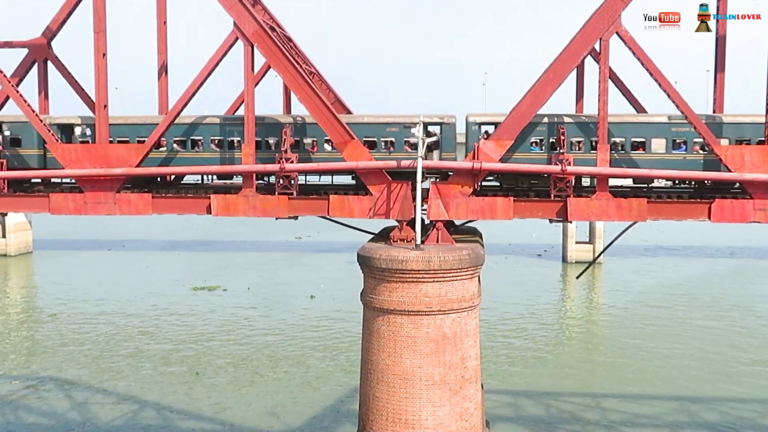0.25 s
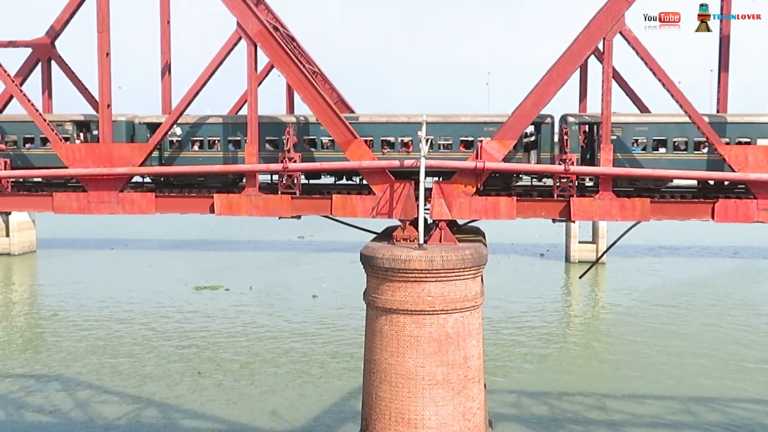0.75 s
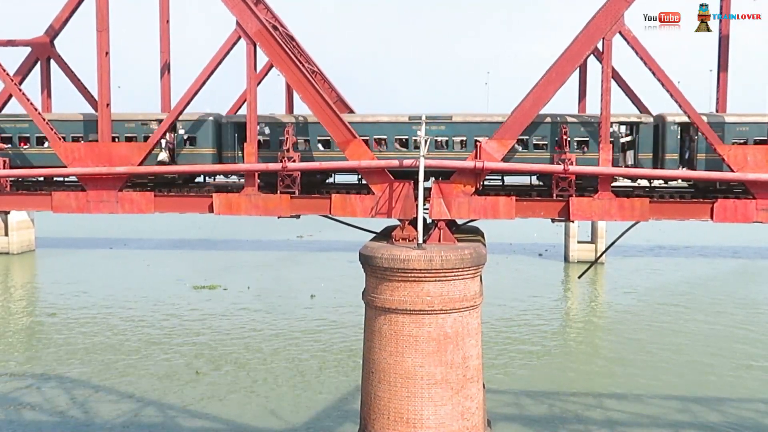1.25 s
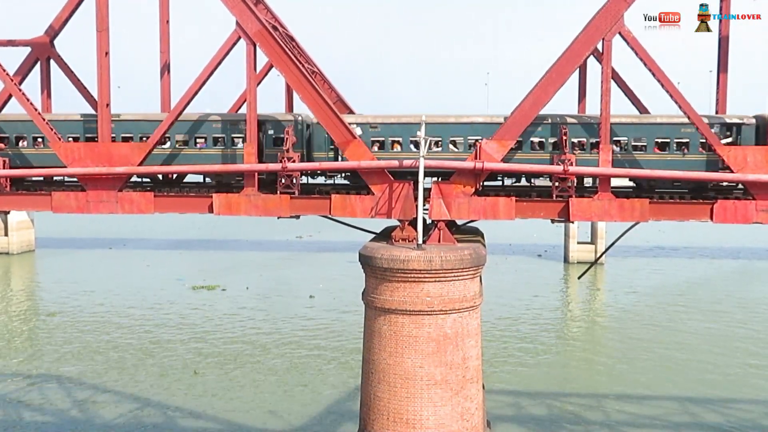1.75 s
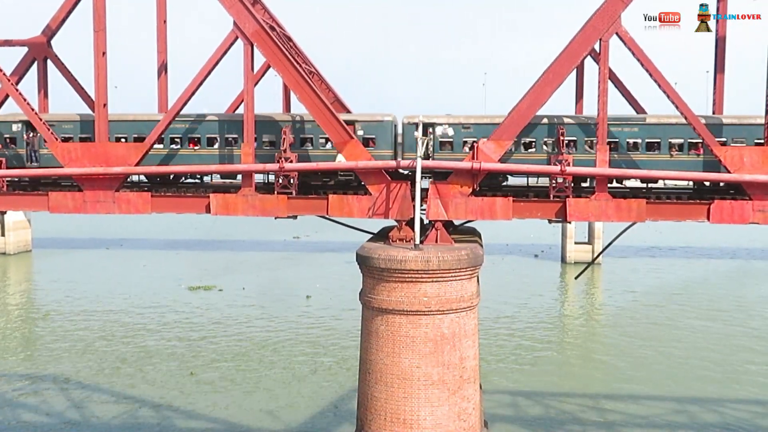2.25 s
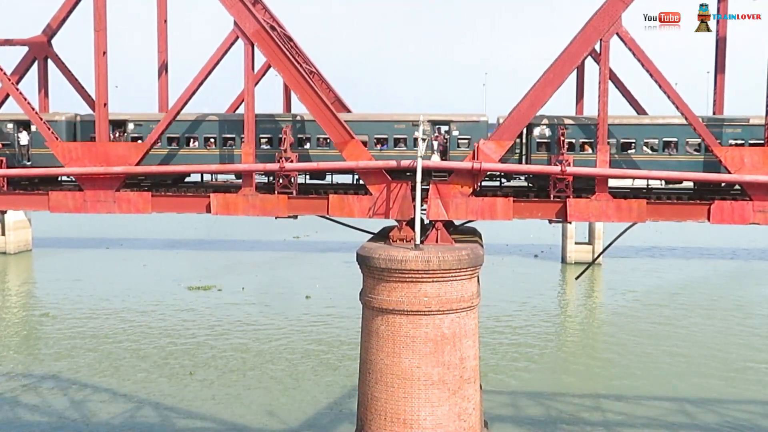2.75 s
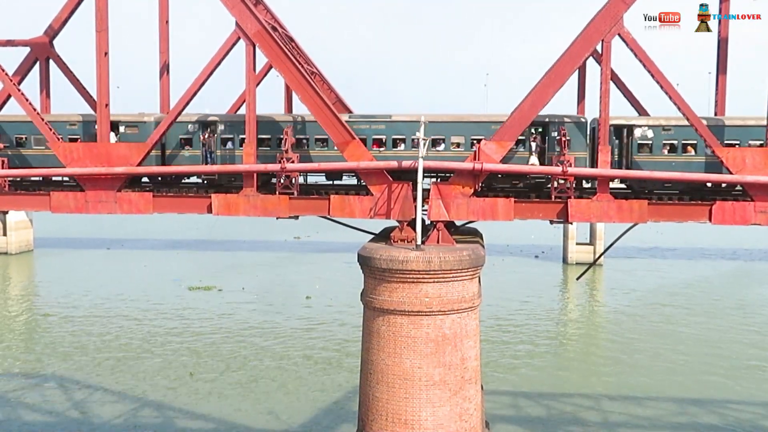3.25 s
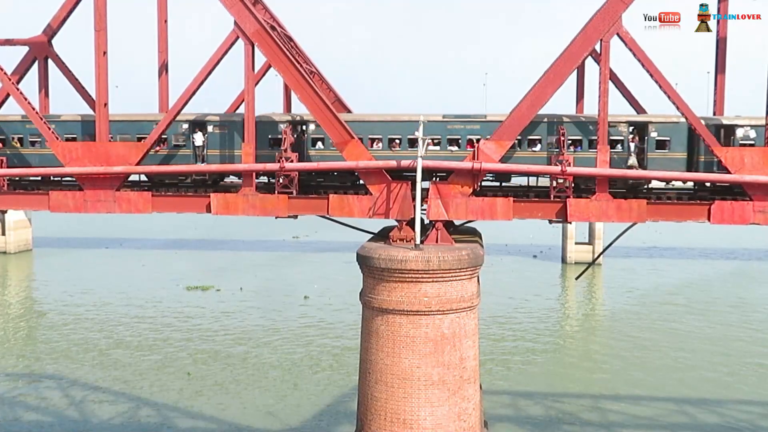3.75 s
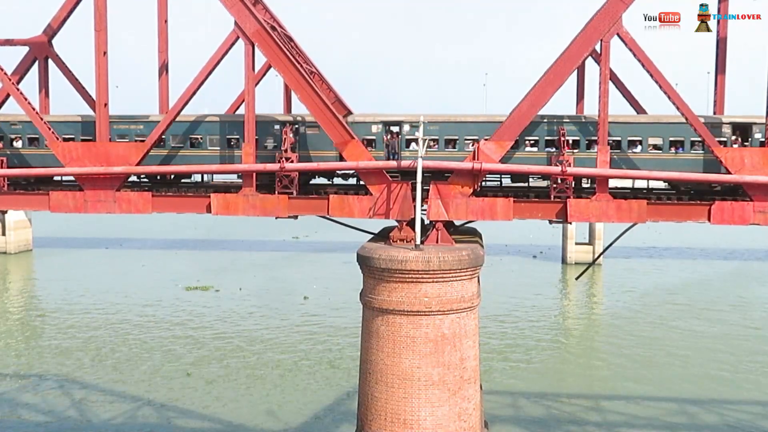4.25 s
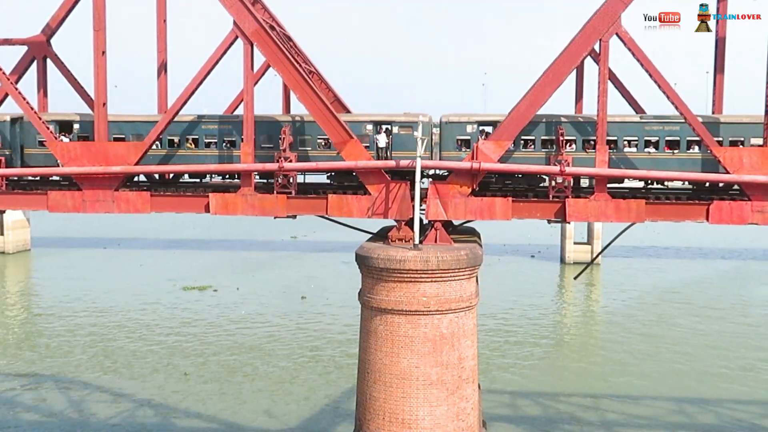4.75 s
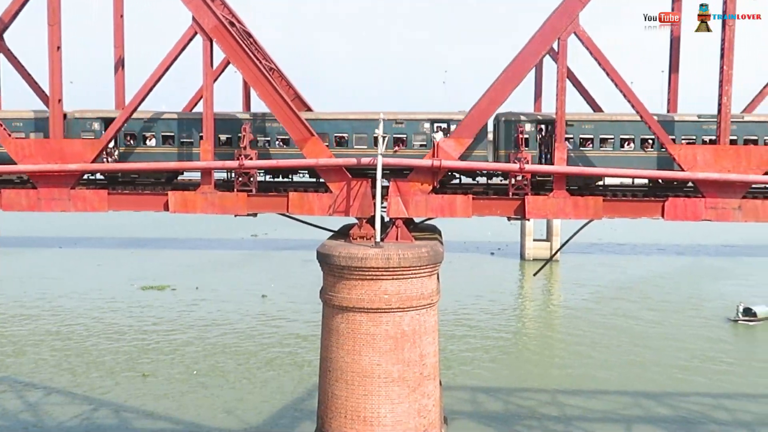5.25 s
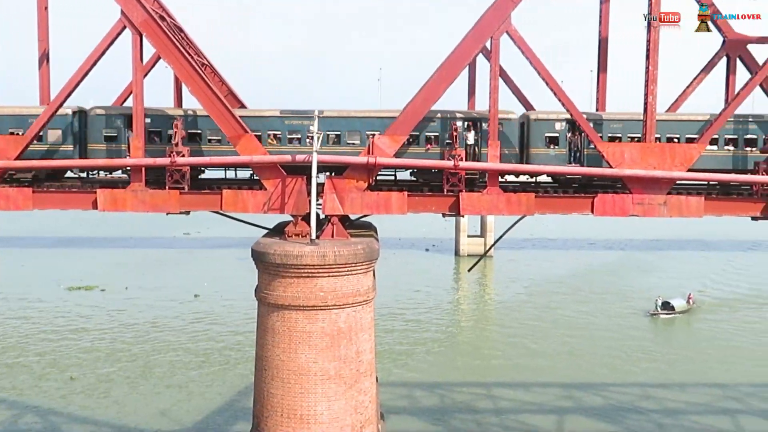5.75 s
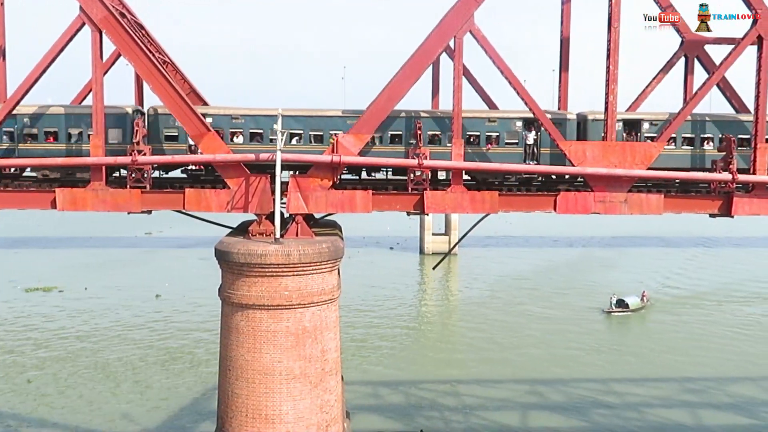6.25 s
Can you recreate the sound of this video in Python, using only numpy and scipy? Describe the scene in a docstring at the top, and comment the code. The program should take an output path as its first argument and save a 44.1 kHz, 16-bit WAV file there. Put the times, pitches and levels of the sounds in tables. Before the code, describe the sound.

Close beside a bridge pier, carriage after carriage rolls past with deep girder rumble, wheel roar, double clacks and rattling, pinging steel.

```python
"""Train on a steel truss bridge

A passenger train rolls over a steel truss bridge, heard from beside a pier. Noise shaped by plate
resonances makes the girders rumble; noise driven by rough treads makes the wheels roar and hiss.
Bogie after bogie strikes a rail joint: decaying noise bursts give a sharp crack, a rattling rebound and
a wash of ringing steel. Decaying or swelling tones make the pings, knocks, groans and flange squeals."""
import sys
import numpy as np
from scipy import signal
from scipy.fft import rfft, irfft
from scipy.io import wavfile
from scipy.ndimage import uniform_filter1d

SR = 44100
rng = np.random.default_rng(int(sys.argv[2]) if len(sys.argv) > 2 else 0)


def generate_wav(signal):
    """Clip the signal to [-1, 1] and save it as 16-bit WAV at the path in sys.argv[1]."""
    frames = np.transpose(np.atleast_2d(signal))
    scaled = np.clip(frames, -1, 1) * 32767
    pcm = np.round(scaled).astype(np.int16)
    wavfile.write(sys.argv[1], SR, pcm)


N = 286650
TIME = np.arange(N) / SR  # s
FREQ = np.maximum(np.arange(N // 2 + 1) * SR / N, 1)  # Hz, kept above zero for the logarithm


def undb(db):
    """Logarithmic level: decibels become an amplitude gain."""
    return 10 ** (np.asarray(db) / 20)


def curve(table, axis):
    """Linear interpolation: one column of a timed table at every sample."""
    rows = np.array(table)
    return np.interp(TIME, rows[:, 0], rows[:, axis])


def humps(table):
    """Gaussian modulation: level in dB from smooth rises and dips (time [s], half length [s], level [dB])."""
    return sum(db * np.exp(-((TIME - at) / length) ** 2) for at, length, db in table)


def shape(points):
    """Spectral envelope: gain at every frequency, interpolated in dB over log frequency."""
    hz, db = np.transpose(points)
    return undb(np.interp(np.log(FREQ), np.log(hz), db))


def walk(rate):
    """Random modulation: twice-smoothed steps, rate per second, with a standard deviation of 1."""
    step = max(int(SR / rate), 1)
    held = np.repeat(rng.standard_normal(N // step + 1), step)
    drift = uniform_filter1d(uniform_filter1d(held, step), step)[:N]
    return drift / np.std(drift)


# Wheels on the joint, two bogies at each coupling; levels are relative, the rebound's to its crack:
# (time [s], crack [dB], truss ring [dB], rebound [dB], rebound delay [s], chatter [dB], clunk [dB],
#  swell of the roar [dB])
JOINT = [(-0.054, -27, -28.5, 8, 0.031, -22, -39, 3.5), (0.2023, -28, -27.5, -20, 0.036, -28, -25.5, -1),
         (0.7724, -35.5, -29.5, 8.5, 0.032, -28, -36, 2.5), (1.0216, -31, -29.5, 0, 0.041, -31.5, -27, 3),
         (1.515, -30, -24, 6, 0.057, -32, -26, 4.5), (1.762, -24.5, -27, -2, 0.036, -31.5, -23, 2.5),
         (2.293, -25, -27, -13, 0.041, -29.5, -33, 2), (2.5378, -25, -27.5, -18, 0.033, -27, -42, 2),
         (3.111, -31, -26.5, 3, 0.022, -24.5, -20, -2), (3.346, -33, -27, 4, 0.043, -32.5, -24, 1.5),
         (3.835, -24.5, -23, 2, 0.042, -31, -26, 3.5), (4.076, -22, -26.5, -1, 0.034, -28, -22, 0),
         (4.601, -26.5, -26.5, -0.5, 0.019, -31, -23.5, 1), (4.8434, -24, -26.5, -11, 0.035, -35, -31, -1),
         (5.408, -35, -29.5, 7, 0.045, -27, -24, 2.5), (5.639, -30.5, -28, -2, 0.041, -30, -24, 0),
         (6.12, -22, -27.5, 1, 0.033, -36, -25, 2), (6.3586, -18.5, -27.5, -4.5, 0.037, -34, -24, 0)]


def swell(lag, half_length, share):
    """Moving load: level in dB that rises or dips as each bogie goes by."""
    return share * sum(lift_db * np.exp(-((TIME - at - lag) / half_length) ** 2) for at, *_, lift_db in JOINT)


def blows(times, levels_db, rise, t60):
    """Impulse response: summed power of vibrations that build up after each blow and decay exponentially."""
    power = np.zeros(N)
    for at, db in zip(times, levels_db):
        span = slice(*np.searchsorted(TIME, [at, at + t60]))
        age = TIME[span] - at
        envelope = (1 - np.exp(-age / rise)) * np.exp(-np.log(1000) * age / t60)
        power[span] += (undb(db) * envelope) ** 2
    return power


def chatter(times, levels_db):
    """Loose contact: power of a rail end that chatters more as the wheel nears and settles behind it."""
    build, fade = 0.035, 0.015  # time constants of power, s
    return sum(undb(db) ** 2 * np.exp(-np.maximum((at - TIME) / build, (TIME - at) / fade))
               for at, db in zip(times, levels_db))


# Stereo width against pitch: (frequency [Hz], side minus mid [dB])
WIDTH = [(30, -25.5), (70, -31), (128, -26), (170, -26.5), (370, -30.5), (440, -24), (510, -25),
         (690, -19.5), (830, -21), (950, -18), (1050, -19), (1470, -16), (2500, -10.5), (4270, -7.5),
         (7270, 0.5)]
# Stereo balance against pitch: (frequency [Hz], left minus right [dB])
LEAN = [(250, -0.3), (500, -0.9), (1000, -1.2), (3000, -0.3)]


def vibration(points, modes=(), grain_db=0, side_db=0):
    """Random excitation of resonances: stereo noise shaped by a spectrum and its modes, mid at unit level."""
    gain = shape(points)
    for hz, width, db in modes:
        gain = gain * undb(db / (1 + (2 * (FREQ - hz) / width) ** 2))
    # the strength of the tiny impacts scatters every 32 samples
    size = undb(grain_db * np.repeat(rng.standard_normal(N // 32 + 1), 32)[:N])
    mid, side = rfft(rng.standard_normal((2, N)) * size) * gain
    side = side * shape(WIDTH) * undb(side_db)
    lean = np.sqrt(shape(LEAN))
    return irfft([(mid + side) * lean, (mid - side) / lean], N) / np.std(irfft(mid, N))


def steady(sound, seconds):
    """Constant load: a vibration held even by dividing out its running RMS level."""
    return sound / np.sqrt(uniform_filter1d(sound[0] ** 2, int(seconds * SR) + 1) + 1e-9)


def rattle(shake, pitches, count, t60, spread_db):
    """Scattered resonators: shaken steel parts ping, each at its own pitch and place, scaled by the shaking."""
    out = np.zeros((2, N))
    age = TIME[:SR // 12]
    envelope = (1 - np.exp(-age / .0004)) * np.exp(-np.log(1000) * age / t60)
    colour, low, high = shape(pitches), pitches[0][0], pitches[-1][0]
    for when, pitch, force, place in rng.random((count, 4)):
        start = int(when * (N - len(age)))
        hz = low * (high / low) ** pitch
        scatter = undb(spread_db * min(-np.log(force), 2))
        size = shake[start] * colour[int(hz * N / SR)] * scatter
        angle = (place - .5) * np.pi * hz / 7000  # higher pings differ more between the ears
        phase = 2 * np.pi * hz * age + np.array([[angle], [-angle]])
        out[:, start:start + len(age)] += size * envelope * np.sin(phase)
    return out


# Single girders bent by the axle load:
# (time [s], standard deviation of the swell [s], pitch [Hz], relative level [dB])
GROANS = [(0.034, 0.083, 176.7, -12), (.19, 0.06, 280, -23), (.42, .04, 99.9, -21),
          (.43, .08, 341.8, -20.5), (.6, 0.064, 122, -24), (0.715, 0.072, 199.4, -17.5),
          (0.88, 0.044, 336.4, -18.5), (0.898, .05, 183, -20), (1.0, .03, 89.8, -23),
          (1.054, 0.081, 204.8, -20), (1.095, 0.043, 429.5, -25.5), (1.61, 0.053, 186.1, -18),
          (1.62, 0.048, 139.9, -19), (1.852, 0.05, 399.4, -23.5), (2.006, 0.047, 188.3, -16.5),
          (2.335, 0.057, 238, -19), (2.35, 0.063, 340, -23), (2.47, .05, 180.5, -19),
          (2.587, 0.092, 209.7, -17.5), (2.46, .05, 110.7, -21.5), (2.64, 0.049, 112.3, -18.5),
          (2.87, 0.039, 186, -17.5), (3.09, 0.05, 200.5, -18), (3.2, 0.047, 376, -20),
          (3.22, 0.048, 155, -14.5), (3.406, .05, 345, -18), (3.43, .045, 193, -16), (3.39, 0.064, 90, -21),
          (3.963, .07, 380.4, -22.5), (4.08, 0.074, 191, -17), (4.133, 0.044, 437, -22.5),
          (4.667, 0.062, 322.3, -18.5), (4.72, 0.091, 165.3, -20), (4.908, 0.064, 155, -17.5),
          (4.92, 0.044, 96, -15), (5.1, 0.075, 220, -28), (5.264, .06, 345, -25),
          (5.497, 0.083, 366.6, -20), (5.909, 0.032, 268.4, -22), (6.133, 0.062, 100.2, -20.5),
          (6.164, 0.045, 370, -19), (6.2, .06, 186.5, -16.5), (6.258, .035, 246.6, -18.5),
          (6.39, 0.049, 339, -21), (6.423, 0.043, 190, -15)]


def groans():
    """Modal cluster: a bent girder swells and fades in twelve close modes round its pitch."""
    bandwidth = .13  # share of the pitch, two standard deviations of the detuning
    out = np.zeros(N)
    for at, length, hz, db in GROANS:
        span = slice(*np.searchsorted(TIME, [at - 2.5 * length, at + 2.5 * length]))
        envelope = np.exp(-((TIME[span] - at) / length) ** 2 / 2)
        detune, phase = rng.standard_normal((2, 12, 1))
        mode_hz = hz * (1 + bandwidth * detune / 2)
        ring = envelope * np.sin(2 * np.pi * (mode_hz * TIME[span] + phase)).sum(axis=0)
        # equal energy however the modes beat
        out[span] += undb(db) * ring * np.linalg.norm(envelope) / np.linalg.norm(ring)
    return out


# Some carriages run rougher than others; relative levels as the middle of each passes:
# (time [s], deck boom [dB], plate rumble [dB], wheel roar [dB], tread hiss [dB], cross-beam drone [dB])
CARRIAGES = [(-0.3, -16.5, -22, -23.5, -43, -18), (0.5, -24.5, -17, -24, -38.5, -24),
             (1.28, -23.5, -21, -27, -42, -21), (2.05, -22, -20, -24, -40.5, -23.5),
             (2.8, -24, -18, -24, -38, -21), (3.62, -24, -19, -24.5, -41.5, -23),
             (4.35, -25, -21, -25, -40.5, -21), (5.12, -22.5, -18, -23, -39.5, -20.5),
             (5.88, -24.5, -20.5, -25, -40, -22), (6.65, -22, -21, -22.5, -32.5, -23.5)]
# Swell of deck and plates with each bogie:
# (lag after the joint [s], half length [s], multiple of the roar's swell [1])
DECK_SWELL = (0.1, 0.077, 0.74)
PLATE_SWELL = (0.09, 0.13, 0.62)
# Heavier booms of the deck: (time [s], relative level [dB])
BOOMS = [(1.09, -14), (1.81, -6.5), (2.25, -9), (2.94, -10.5), (3.08, -10), (3.26, -10), (4.48, -19),
         (6.1, -18)]
# Spectra of deck boom, plate rumble and cross-beam drone: (frequency [Hz], relative density [dB per Hz])
DECK = [(15, -57), (25, -42), (33, -22.5), (41, -11), (50, -9), (62, -5), (90, 1.5), (120, 0), (140, -13),
        (200, -37), (500, -120)]
GIRDERS = [(40, -72.5), (125, -17), (150, -7), (190, -2.5), (250, -0.5), (290, -1), (360, -4.5), (420, -4),
           (490, -9.5), (600, -23.5), (780, -41), (1300, -120)]
BEAMS = [(40, -82), (80, -45), (115, -10), (140, 0.5), (180, 5.5), (205, 0), (235, -18.5), (400, -59.5),
         (1200, -130)]
# Resonances of the girder plates: (frequency [Hz], width [Hz], boost [dB])
PLATES = [(68.4, 16, 5), (89.5, 30, 3.5), (120, 13, 0), (127.7, 7.9, 5.5), (154.4, 8.2, 5), (175, 16, 0.5),
          (237, 34, 5.5), (254, 13.4, 2), (312, 18, 2.5), (350.6, 36, 4), (611, 44, 9)]
# The bridge relaxes between bogies: (time [s], half length [s], level change [dB])
SAGS = [(.02, .05, -1), (1.28, 0.052, -0.5), (1.73, .04, -1), (2.19, .05, -2), (3.68, 0.08, -1),
        (4.24, .04, 0.5), (4.42, 0.05, -1.5), (5.83, .05, -0.5), (6.5, .04, -0.5)]


def girders():
    """Forced vibration: deck booms, cross beams drone and plates rumble in resonances under the moving load."""
    load = undb(curve(CARRIAGES, axis=1) + swell(*DECK_SWELL) - 0.45 + 1.1 * walk(12)) ** 2
    booms = blows(*np.transpose(BOOMS), rise=0.017, t60=0.26) * undb(1.5) ** 2
    deck = steady(vibration(DECK, PLATES, side_db=4.0), .16) * np.sqrt(load + booms)
    plate_swell = swell(*PLATE_SWELL)
    plate_level = undb(curve(CARRIAGES, axis=2) + plate_swell + 0.55 * walk(22))
    plates = steady(vibration(GIRDERS, PLATES), 0.12) * plate_level
    beam_level = undb(curve(CARRIAGES, axis=5) + plate_swell - 0.5)
    beams = steady(vibration(BEAMS, PLATES), .13) * beam_level
    return (deck + plates + beams + groans() * undb(-1.5)) * undb(humps(SAGS) + 0.09)


# Rough and smooth stretches of tread: (time [s], half length [s], level change [dB])
TREAD = [(.51, .06, -2), (0.627, .025, 1), (0.738, .04, 3), (.9, .04, 1), (1.06, 0.059, 3.5),
         (1.328, .05, 0.5), (1.66, .04, 1), (2.038, 0.045, 0), (2.19, 0.069, -2), (2.728, .035, 1.5),
         (3.116, 0.076, 3), (3.702, .04, -1.5), (4.117, 0.032, 4), (4.218, .03, -1), (4.31, 0.043, 2),
         (4.415, 0.046, -1.5), (5.048, 0.037, 1.5), (5.652, .04, 3.5), (5.79, .04, 0.5)]
# Swell of roar and hiss with each bogie:
# (lag after the joint [s], half length [s], multiple of the roar's swell [1])
ROAR_SWELL = (0.052, 0.087, 0.95)
HISS_SWELL = (.02, 0.089, 0.93)
# Spectra of wheel roar and contact hiss: (frequency [Hz], relative density [dB per Hz])
ROAR = [(250, -34), (450, 2), (680, 4), (1000, -2), (1500, -9.5), (2200, -14), (3200, -23), (6000, -52),
        (12000, -77.5)]
HISS = [(900, -6), (2000, 2.5), (3000, 3), (4000, -2.5), (5500, -6), (6500, -9.5), (7200, -17.5),
        (9000, -23.5), (11000, -29.5), (12500, -26.5), (15000, -45)]
# Pitch range and loudness of the rattling braces: (frequency [Hz], relative level [dB])
BRACES = [(520, -1), (800, -4.5), (1300, -4.5), (2200, -13), (3200, -10)]
# Wheel and rail modes: (frequency [Hz], width [Hz], boost or cut [dB])
WHEEL = [(1746, 37, 5.5), (2460, 160, 0.5), (2750, 56, -11), (3420, 70, -2.5), (3620, 90, 0),
         (4530, 64, 0.5), (6000, 60, 3.5), (6400, 200, 3)]


def rolling():
    """Roughness excitation: treads roar on the rails and shake the braces, with a gritty contact hiss."""
    roar_db = curve(CARRIAGES, axis=3) + swell(*ROAR_SWELL) + humps(TREAD)
    drive = undb(roar_db - 1.36 + 0.35 * walk(35))
    roar = steady(vibration(ROAR, grain_db=1.5), 0.08) * drive
    braces = rattle(drive, BRACES, count=900, t60=.08, spread_db=3.0) * undb(-6.5)
    hiss_level = undb(curve(CARRIAGES, axis=4) + swell(*HISS_SWELL) - 2.4 + 0.5 * walk(30))
    return roar + braces + vibration(HISS, WHEEL) * hiss_level


# Spectra of the crack and of the ringing truss: (frequency [Hz], relative density [dB per Hz])
CRACK = [(400, -17), (1300, -14), (2000, 3), (2800, 7.5), (4500, -2.5), (6400, -7.5), (7500, -12),
         (10000, -16), (13000, -20.5), (15500, -34.5)]
TRUSS = [(200, 16), (600, 11), (1200, 7.5), (2000, 0.5), (3100, 0), (4200, -8), (6400, -11), (7400, -17),
         (10000, -28), (12700, -29.5), (15500, -53)]
# Pitch range and loudness of the pinging bolts: (frequency [Hz], relative level [dB])
BOLTS = [(1300, 4), (2000, -1.5), (3100, -2), (4200, -6), (6400, -9)]


def joint():
    """Impact and structural transmission: each bogie cracks over the gap and rebounds, and the truss rings."""
    at, crack_db, ring_db, rebound_db, delay, chatter_db, _, _ = np.transpose(JOINT)
    # a hard front where steel meets steel, then the rail end rings briefly
    front = blows(at, crack_db + 3.5, rise=0.00024, t60=0.03)
    crack = front + blows(at, crack_db - 8.0, rise=0.00037, t60=0.27)
    rebound = blows(at + delay, crack_db + rebound_db, rise=0.0037, t60=0.2)
    ring = blows(at, ring_db, rise=0.017, t60=0.85) + chatter(at, chatter_db)
    strike_level = np.sqrt(crack + undb(-5.5) ** 2 * rebound)
    strike = vibration(CRACK, WHEEL, grain_db=1.0, side_db=-8) * strike_level
    truss_level = np.sqrt(ring) * undb(2.5 + 1.1 * walk(90))
    truss = vibration(TRUSS, WHEEL, grain_db=0.5, side_db=-5.5) * truss_level
    shake = np.sqrt(ring + rebound / 2)
    pings = rattle(shake, BOLTS, count=2400, t60=.05, spread_db=3.0) * undb(-4.5)
    return strike + truss + pings


# Spectrum of the dull clunk in the heavy girders: (frequency [Hz], relative density [dB per Hz])
CLUNK = [(200, -20), (400, 10), (750, 4.5), (1100, 8), (1600, -7), (2500, -12.5), (3500, -19.5),
         (6000, -28), (12000, -81)]


def clunks():
    """Delayed response: heavy members knock with the rail, answer each blow late and low, and plates thud."""
    at, _, _, _, _, chatter_db, clunk_db, _ = np.transpose(JOINT)
    power = blows(at + 0.032, clunk_db, rise=0.0099, t60=0.4) + chatter(at - 0.025, chatter_db - 3)
    clunk = vibration(CLUNK, grain_db=0.5) * np.sqrt(power) * undb(2.5 + 2.5 * walk(70))
    thud = blows(at + 0.043, clunk_db + 10.5, rise=0.017, t60=0.25)
    return clunk + vibration(GIRDERS, PLATES) * np.sqrt(thud)


def skips(times, levels_db, count):
    """Repeated impact: power of the light, uneven knocks after each blow, on average weaker the later."""
    span, fade, scatter_db = 0.14, 74, 2.5  # s, dB per s, dB
    lag = span * (np.arange(count) + 0.27 + rng.random((len(times), count))) / count
    db = levels_db[:, None] - 2.5 - fade * lag + scatter_db * rng.standard_normal(lag.shape)
    return blows((times[:, None] + lag).ravel(), db.ravel(), rise=0.00069, t60=0.052)


# Loose fishplates and sleeper plates between the main blows: (time [s], relative level [dB])
CLACKS = [(.0428, -29), (.6939, -33), (.735, -29), (.778, -34), (.9742, -29), (1.06, -31), (1.4955, -32),
          (1.5414, -31), (1.5649, -22), (1.589, -22), (1.6457, -33), (1.8004, -27), (1.82, -32),
          (2.2628, -29), (2.5018, -32), (2.6215, -32), (3.04, -31), (3.0685, -25), (3.1333, -23),
          (3.8776, -28), (3.908, -22), (4.1156, -24), (4.627, -29), (5.0081, -34), (5.3228, -33),
          (5.6601, -29), (6.16, -29), (6.3345, -31)]
# Spectrum of the clacks: (frequency [Hz], relative density [dB per Hz])
CLACK = [(300, -10), (600, 0), (1100, 7.5), (2000, 1), (3000, 1.5), (4500, -5), (6400, -10), (7500, -20),
         (12500, -31), (15500, -48)]


def clacks():
    """Secondary impact: loose plates clack and the wheel skips on, both duller than the crack of the joint."""
    at, _, ring_db, *_ = np.transpose(JOINT)
    power = blows(*np.transpose(CLACKS), rise=.0012, t60=0.061) + skips(at, ring_db, count=9)
    return vibration(CLACK, WHEEL, grain_db=2.5, side_db=-4) * np.sqrt(power) * undb(-0.5)


# The clatter comes now from one spot, now from all over the span: (time [s], change of width [dB])
SPREAD = [(.22, -5.5), (.8, 1), (1.06, 1), (1.57, 0), (1.8, 0), (2.32, -1), (2.56, -2), (3.13, 0),
          (3.38, 1), (3.88, 0), (4.11, 1), (4.63, -3), (4.87, -2), (5.43, -2), (5.66, -1), (6.15, -2),
          (6.38, 1)]


def spread(sound):
    """Source width: the stereo difference grows or shrinks as the sound moves through the span."""
    mid = sound.mean(axis=0)
    return mid + (sound - mid) * undb(curve(SPREAD, axis=1))


# Single members jolted into ringing, heavy beams to small plates:
# (time [s], pitch [Hz], relative level [dB])
KNOCKS = [(.203, 1556, -27), (0.244, 253.4, -17), (.345, 521, -20.5), (.63, 1010, -29), (.69, 813, -22),
          (.712, 2912, -34), (.732, 853, -21), (.738, 1294, -27), (1.022, 3000, -33), (1.065, 2410, -30),
          (1.513, 2610, -31), (1.541, 1033, -24), (1.562, 2920, -28), (1.762, 5620, -37), (1.776, 851, -21),
          (1.809, 1033, -28), (2.034, 728, -25), (2.293, 4540, -33), (2.68, 866, -25), (2.731, 732, -21),
          (3.065, 1594, -25), (3.135, 2820, -29), (3.155, 1205, -27), (3.235, 440, -17), (3.345, 2910, -33),
          (3.395, 3700, -33), (3.464, 1190, -30), (3.574, 627, -26), (3.815, 224, -11), (3.832, 2555, -28),
          (3.835, 4420, -30), (3.877, 2520, -25), (3.917, 1330, -28), (3.928, 1048, -21), (4.07, 626, -20),
          (4.076, 3250, -29), (4.116, 2444, -25), (4.131, 1563, -25), (4.147, 1824, -27),
          (4.275, 866, -21.5), (4.542, 642, -23.5), (4.752, 640, -19.5), (4.843, 4430, -43),
          (4.995, 665, -23), (5.176, 857, -26), (5.332, 1291, -24), (5.409, 3186, -34), (5.414, 882, -23),
          (5.576, 178, -12), (5.639, 2460, -31), (5.661, 143.4, -14.5), (5.868, 691, -20.5),
          (6.02, 177, -13), (6.194, 3270, -29), (6.393, 1050, -28), (6.408, 778, -20)]
# Modes of a jolted member: (multiple of its pitch [1], relative level [dB])
MEMBER = [(1.002, -0.5), (1.17, -8.5), (1.519, -16), (2.3, -21.5)]


def knocks():
    """Modal ringing: a jolted member sounds a few modes; the low, heavy ones speak slowly and ring longer."""
    rise_cycles, t60_at_1khz = 2.4, 0.13  # cycles of the pitch, s
    out = np.zeros(N)
    for at, hz, db in KNOCKS:
        t60 = t60_at_1khz * np.sqrt(1e3 / hz)
        span = slice(*np.searchsorted(TIME, [at, at + t60]))
        age = TIME[span] - at
        envelope = (1 - np.exp(-age * hz / rise_cycles)) * np.exp(-np.log(1000) * age / t60)
        ring = sum(undb(mode_db) * np.sin(2 * np.pi * (hz * ratio * age + rng.random()))
                   for ratio, mode_db in MEMBER)
        out[span] += undb(db) * envelope * ring
    return out * undb(5.0)


# Clinks of loose fittings and couplings: (time [s], relative level [dB])
CLINKS = [(0.2987, -36), (0.5871, -46), (0.9497, -41), (1.2201, -47), (2.616, -31), (3.03, -38),
          (3.3882, -46), (4.3176, -38), (5.3268, -45), (5.6894, -45), (5.8361, -39)]


def fittings():
    """Light impact: small steel parts clink now and then in short bursts of bright noise."""
    power = blows(*np.transpose(CLINKS), rise=.0006, t60=0.13)
    # (frequency [Hz], relative density [dB per Hz])
    colour = [(1000, -7), (3000, 9.5), (6500, -6), (8000, -5.0), (12500, -20), (15500, -20)]
    return vibration(colour) * np.sqrt(power) * undb(-3.0)


# Brief singing of the flanges against the rail:
# (time [s], half length [s], central pitch [Hz], glide [Hz per s], relative level [dB])
FLANGE = [(.60, .028, 5900, 0, -51), (.635, .015, 4050, 0, -46), (.87, .025, 4850, 0, -51),
          (.96, .03, 6100, -9000, -52), (1.496, .015, 6370, 0, -51), (1.92, .025, 6580, 0, -59),
          (2.27, .025, 5900, 0, -46), (2.385, .035, 6450, 0, -43), (2.495, .045, 4850, 7000, -47),
          (2.93, .024, 5960, 0, -57), (3.755, .028, 6400, 0, -52), (4.151, .012, 6460, 0, -46),
          (4.669, .015, 6240, 0, -44), (5.03, .04, 6030, 2, -51), (5.42, .043, 6350, 0, -42),
          (6.025, .03, 6150, 0, -51), (6.2, .04, 6400, 0, -37), (6.365, .06, 4730, 0, -43)]


def flanges():
    """Frictional self-excitation: a rubbing flange sings a thin, scratchy, sliding tone with a weak octave."""
    out = np.zeros(N)
    waver = 1 + .008 * walk(80) + .03 * walk(2000)  # slow wander and fast scratch of the pitch
    for at, length, hz, glide, db in FLANGE:
        span = slice(*np.searchsorted(TIME, [at - 2 * length, at + 2 * length]))
        age = TIME[span] - at
        phase = 2 * np.pi * np.cumsum((hz + glide * age) * waver[span]) / SR
        tone = np.sin(phase) + undb(-16.5) * np.sin(2 * phase)
        out[span] += undb(db) * np.exp(-(age / length) ** 2) * tone
    return out * undb(3 * walk(120))


def scene():
    """Superposition: bridge, wheels, joint and fittings sound together."""
    clatter = spread(joint() + clacks())
    return girders() + rolling() + clatter + clunks() + knocks() + fittings() + flanges()


def record(dry):
    """Saturation and band limiting: the highest peaks are rounded and the top is cut."""
    ceiling, top_hz = 0.98, 15600
    low_pass = signal.ellip(8, .2, 70, top_hz, fs=SR, output="sos")
    return signal.sosfilt(low_pass, ceiling * np.tanh(dry / ceiling))


dry = scene()
out = record(dry)
generate_wav(out)
```